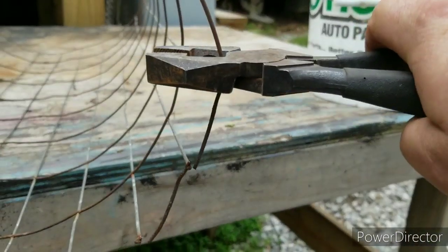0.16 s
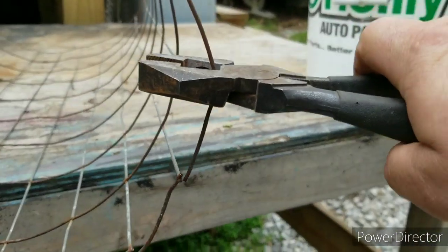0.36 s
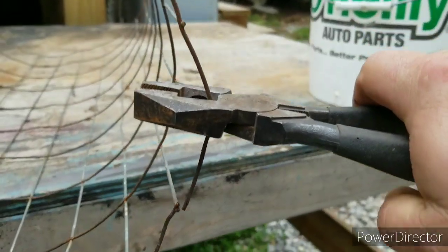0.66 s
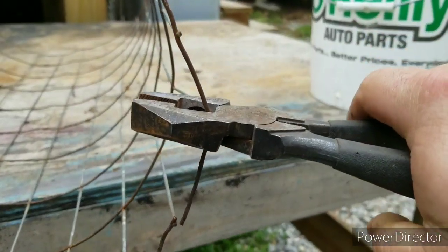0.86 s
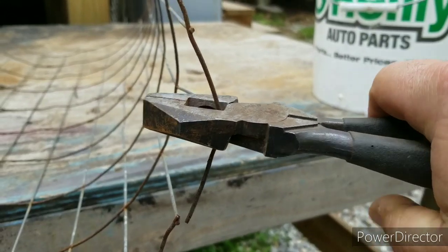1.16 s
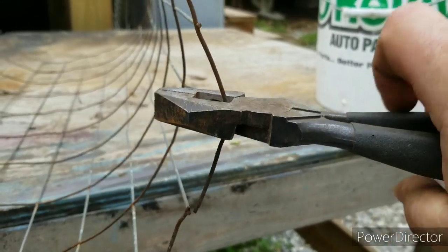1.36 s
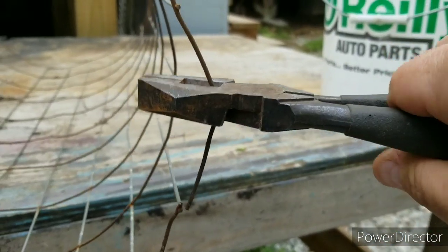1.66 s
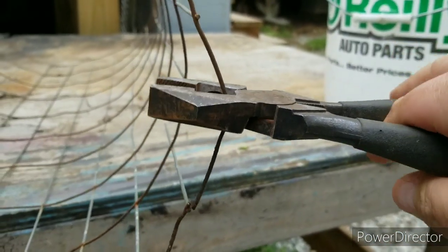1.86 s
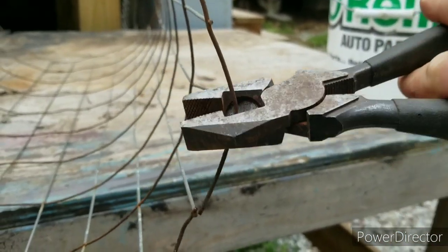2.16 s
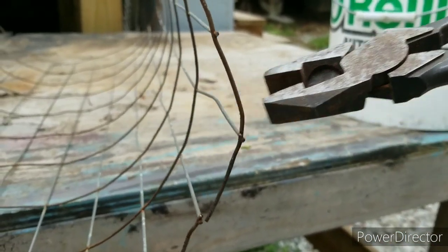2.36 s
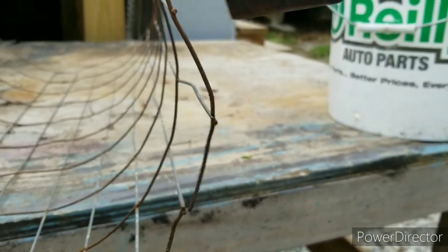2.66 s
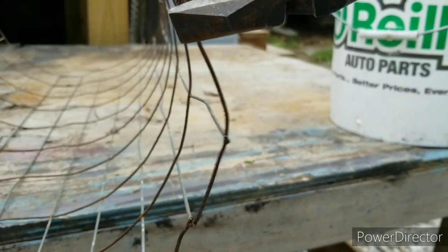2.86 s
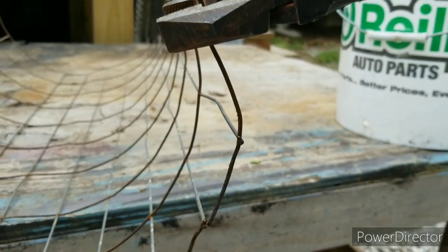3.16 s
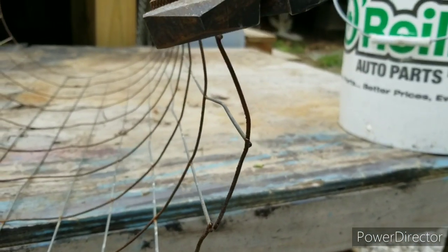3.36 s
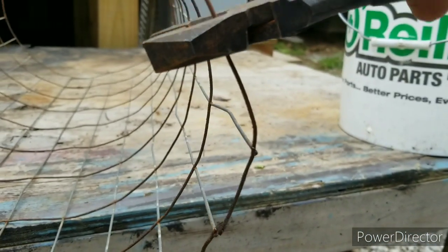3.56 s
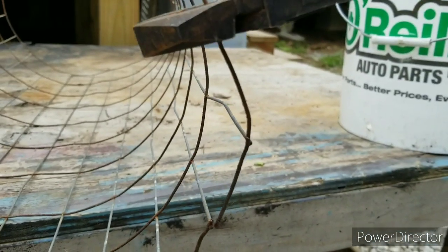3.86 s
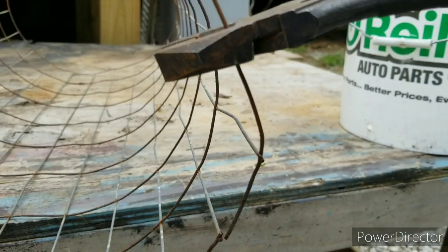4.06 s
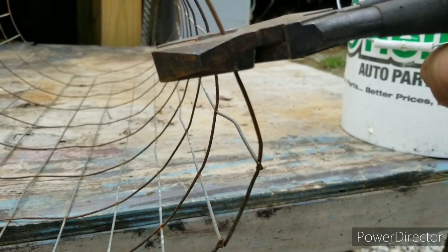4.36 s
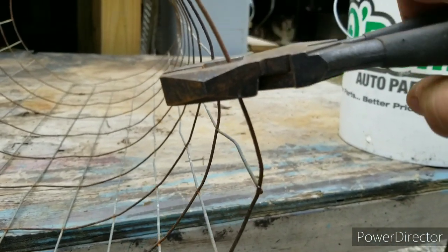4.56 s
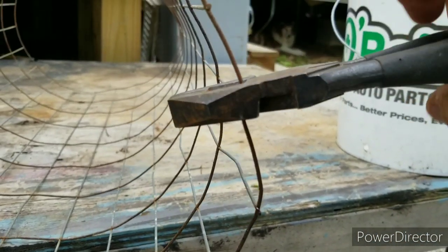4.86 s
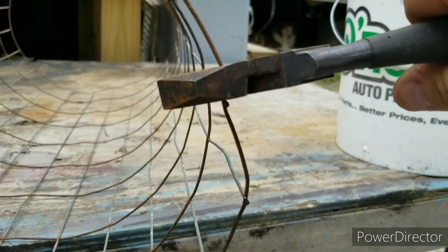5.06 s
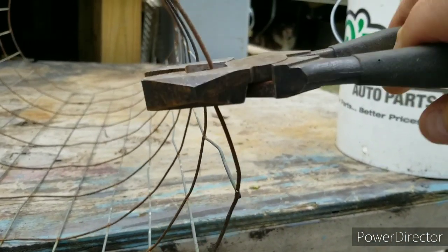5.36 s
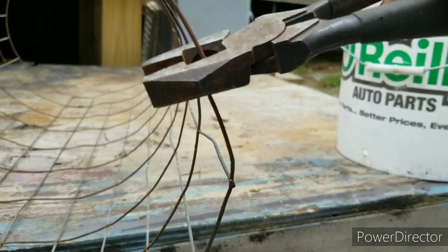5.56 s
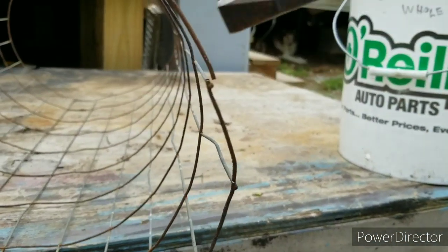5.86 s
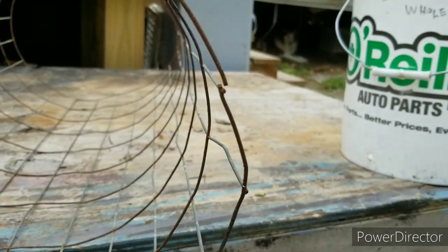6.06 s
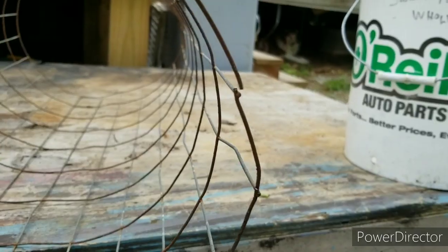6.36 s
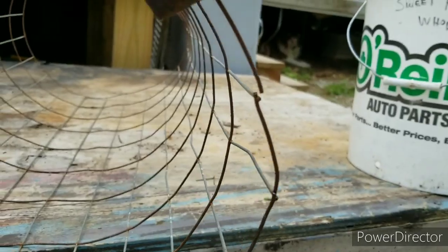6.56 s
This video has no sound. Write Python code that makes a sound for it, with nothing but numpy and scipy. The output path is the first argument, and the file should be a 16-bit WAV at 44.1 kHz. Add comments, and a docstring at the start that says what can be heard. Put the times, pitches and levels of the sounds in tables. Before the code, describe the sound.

Two hard metallic snips cut strands of a springy wire fence roll, with rattling, scraping mesh shivers over crickets and birds outdoors.

```python
"""Two hard snips, metallic shivers, taps and scrapes: heavy pliers cut two strands of a wire fence roll on a wooden
table outdoors. Each cut is a burst of cracks ringing the jaws, the freed ends and the table; jolts, shaking and
scrapes drive noise through the springy mesh's crowd of modes. Slips squeal, caught strands sing, the roll hums.
Around them: insect clicks through wing resonances, gliding and husky bird calls, rumble, hiss, a breeze and grip
bumps at a handheld two-port microphone."""
import sys
import numpy as np
from scipy import signal
from scipy.fft import rfft, irfft, next_fast_len
from scipy.io import wavfile
from scipy.ndimage import uniform_filter1d, map_coordinates

SR = 44100
rng = np.random.default_rng(int(sys.argv[2]) if len(sys.argv) > 2 else 0)


def log_audio(samples):
    """Write samples as a 16-bit WAV file to the path given in sys.argv[1]."""
    # one column per channel
    frames = np.atleast_2d(samples).T
    # limit to full scale, then quantise
    limited = np.clip(frames, -1, 1)
    pcm = np.round(limited * 32767).astype(np.int16)
    wavfile.write(sys.argv[1], SR, pcm)


N = 295911
TIME = np.arange(N) / SR  # [s]

# jolts to the mesh: (time [s], level [dB], bass [dB], treble [dB], ring length [factor],
#                     favoured pitch [Hz], favour [dB], hum level [dB])
JOLTS = [(1.241, -42, -1, 4, 1.5, 11700, 10, -38.5), (2.349, -36, -3, -2.5, 2.4, 4200, 1.5, -52),
         (2.383, -34, 0, -7.5, 1.84, 1560, 2.5, -43.5), (2.912, -41.5, 6, 8.5, 1.2, 1300, 11.5, -60),
         (3.163, -39, 3.5, -4.5, 1.34, 1680, 1, -44.5), (3.46, -48, 2, 7, 1.06, 4670, -2, -44.5),
         (3.625, -40, 0, -11.5, 1.54, 1620, 5, -46), (4.726, -28.5, -6.5, 4.5, 1.34, 1460, 5.5, -49),
         (5.028, -43, -16, 0.5, 1.82, 4960, -1, -58), (5.669, -44.5, -32, 7.5, 0.66, 4270, 3.5, -66),
         (5.845, -44.5, 7, 11, 1.02, 2080, 5.5, -45.5)]
# steady shaking of the roll by hand and jaws: (time [s], level [dB])
SHAKING = [(0, -53.5), (.6, -55.5), (.75, -66), (1.238, -64.5), (1.5, -45.5), (1.9, -54), (2.33, -50.5),
           (2.7, -56.5), (3.15, -43), (3.3, -46.5), (3.678, -48), (4.1, -63), (4.72, -58.5), (5.099, -63),
           (5.6, -54), (5.78, -38), (6.0, -45), (6.35, -55), (6.71, -55.5)]
# likeness of low sounds at the ports: (frequency [Hz], left-right likeness [-1..1])
LOW_ALIKE = [(25, .45), (60, .75), (130, .92), (300, .92), (640, .6)]
# tilt of low sounds between the ports: (frequency [Hz], left minus right [dB])
LOW_BALANCE = [(25, -6), (60, -2.5), (150, -.6)]


def amp(db):
    """Decibels to gain."""
    return 10 ** (np.asarray(db) / 20)


def unit(x):
    """Scaled to rms 1."""
    return x / np.sqrt(np.mean(x ** 2) + 1e-20)


def along(points, hz):
    """Interpolate (Hz, value) points on a log frequency axis."""
    point_hz, values = np.transpose(points)
    return np.interp(np.log(hz + 1), np.log(point_hz + 1), values)


def level(rows):
    """Gain per sample from (s, .., dB) rows; -150 dB outside them."""
    rows = np.array(rows)
    return amp(np.interp(TIME, rows[:, 0], rows[:, -1], left=-150, right=-150))


def held(s, hold_s, attack_s, release_s):
    """Gain that rises from s, holds at 1 and falls away."""
    rise = (TIME - s) / attack_s
    fall = (s + attack_s + hold_s + release_s - TIME) / release_s
    return np.clip(np.minimum(rise, fall), 0, 1) ** 2


def wobble(knots_per_s):
    """A smooth random curve through normally distributed knots."""
    knots = rng.standard_normal(int(N * knots_per_s / SR) + 4)
    return map_coordinates(knots, [TIME * knots_per_s])


def filtered(x, response):
    """x times a complex response of frequency."""
    m = next_fast_len(x.shape[-1] + SR // 4)
    return irfft(rfft(x, m) * response(np.fft.rfftfreq(m, 1 / SR)), m)[..., :x.shape[-1]]


def resonances(modes):
    """Causal response of (Hz, width Hz, dB) modes of alternating sign."""
    return lambda f: sum((-1) ** k * amp(db) * 1j * f * width / (hz * hz - f * f + 1j * f * width)
                         for k, (hz, width, db) in enumerate(modes))


def causal(gain):
    """Minimum-phase response of this gain: it rings only after its cause."""
    cepstrum = irfft(np.log(gain + 1e-9))
    half = len(cepstrum) // 2
    fold = np.r_[1, 2 * np.ones(half - 1), 1, np.zeros(half - 1)]
    return np.exp(rfft(cepstrum * fold))


def stereo(pair, gain, alike):
    """Two unrelated signals coloured and mixed to a left-right likeness."""
    turn = lambda hz: np.arccos(np.clip(along(alike, hz), -1, 1)) / 2
    mid, side = filtered(pair, lambda hz: gain(hz) * [np.cos(turn(hz)), np.sin(turn(hz))])
    return np.array([mid + side, mid - side])


def leaning(pair, balance):
    """A pair tilted left or right by frequency."""
    return filtered(pair, lambda f: amp(np.outer([.5, -.5], along(balance, f))))


def add(track, s, sound):
    """Mix a sound in from s seconds, cropped to the track."""
    k = round(s * SR)
    part = track[..., max(k, 0):k + sound.shape[-1]]
    part += sound[..., max(-k, 0):][..., :part.shape[-1]]


def snips():
    """A breaking strand's burst of cracks rings jaws and freed ends and knocks the table; it reaches right first."""
    # breaks: (time [s], ring energy [dB], low ring [dB], lower bite [dB], high ring [dB],
    #          table knock peak [dB], ring of the ends [dB])
    breaks = [(1.2458, 11, 0, 1, 2, -27, -39.5), (1.2471, 5, 3, 0, 0, -40, -50),
              (4.7229, -22, -6, -4, 0, -60, -70), (4.7252, 1, -3, -3, -3, -40, -46),
              (4.7260, 12, -8, -6, -3, -27, -35)]
    # ring of jaws and cut ends: (frequency [Hz], width [Hz], level [dB])
    jaws = [(1840, 110, 5), (4000, 550, 3), (4700, 550, 5.5), (6050, 480, 6), (7400, 700, -6),
            (9000, 1500, -14), (11100, 550, 1), (13300, 1000, -5)]
    # tilt of that ring: (frequency [Hz], left minus right [dB])
    jaw_balance = [(900, 0), (1900, 5), (4700, 4), (6000, 1), (8000, -8), (11000, -4), (14000, 0)]
    # wooden top: (frequency [Hz], width [Hz], level per pass [dB])
    table_top = [(123, 21, 0.5), (308, 200, 0.5)]
    # freed wire ends: (frequency [Hz], relative level [dB], t60 [s])
    free_ends = [(1182, 0, .32), (1303, -2, .55), (1635, -3, .4), (1738, -5, .35), (1984, -7, .4),
                 (3036, -7, .3), (5373, -4, .2)]
    break_s, left_lag_s = .00028, .000454
    shared = .75  # part of the burst's power both ports hear alike
    out, t = np.zeros((2, N)), np.arange(SR // 3) / SR
    waver = wobble(60)  # the loose ends chatter
    for s, db, low_db, bite_db, high_db, knock_db, ends_db in breaks:
        shape = (t / break_s) * np.exp(1 - t / break_s)
        both, left, right = rng.standard_normal((3, len(t)))
        burst = shape * (np.sqrt(shared) * both + np.sqrt(1 - shared) * np.array([left, right]))
        burst[0] = np.roll(burst[0], round(left_lag_s * SR))

        tone = [(900, low_db - 8), (1500, low_db), (2500, low_db), (3000, bite_db - 6), (3600, bite_db),
                (4800, bite_db), (5600, 0), (7000, 0), (9000, high_db)]
        rung = filtered(burst, lambda f: resonances(jaws)(f) * amp(along(tone, f)))
        ring = leaning(rung + amp(-21.5) * burst, jaw_balance)
        add(out, s, amp(db) * ring / np.linalg.norm(ring))

        knock = filtered(shape, lambda f: resonances(table_top)(f) ** 2)  # steep skirts: the thud stays low
        add(out, s, amp(knock_db) * knock / np.abs(knock).max())

        ends = 0
        for hz, rel_db, t60_s in free_ends:
            port_db = rng.normal(0, 1.6, (2, 1))
            chatter_db = 4.5 * np.roll(waver, rng.integers(N))[:len(t)]
            gain = amp(rel_db + port_db + chatter_db - 60 * t / t60_s)
            ends = ends + gain * np.sin(2 * np.pi * (hz * t + rng.random((2, 1))))
        add(out, s, amp(ends_db) * ends * (1 - np.exp(-t / 0.00182)))
    return out


def mesh():
    """Jolts, shaking and scrapes fill a crowd of wire modes; after a jolt the high ones die first."""
    # crowd of wire modes: (frequency [Hz], relative density [dB per Hz])
    crowd = [(53, -39), (90, -10.5), (228, -5.5), (295, -4), (390, -9.5), (539, -11.5), (1170, -13),
             (1390, -23), (1660, -8), (2720, -9), (4460, -10.5), (6580, -11.5), (9100, -30), (9920, -19),
             (15600, -25)]
    # modes that stand out: (frequency [Hz], width [Hz], level before a common lift [dB])
    strands = [(346, 29, -7.5), (446, 83, -8), (609, 12, -14), (807, 19, -10), (876, 20, -10),
               (1050, 12, -9.5), (1183, 26, -12.5), (1581, 65, -10), (1632, 25, -11), (1720, 18, -9),
               (2010, 12, -6.5), (2243, 17.5, -1.5), (3003, 55, -10), (4516, 110, -6.5), (5380, 100, -9)]
    # decay at ring length 1: (frequency [Hz], t60 [s])
    decay = [(120, 2.3), (400, 1.47), (1040, 0.97), (2760, 0.46), (7280, 0.3), (14000, 0.3)]
    # likeness at the ports: (frequency [Hz], left-right likeness [-1..1])
    alike = [(60, 0.95), (240, 1), (950, 0.72), (3770, -0.25), (15000, 0.026)]
    # tilt between the ports: (frequency [Hz], left minus right [dB])
    balance = [(60, -4), (180, 1), (550, -1.5), (1650, 4.5), (4970, 2.5), (15000, -4.5)]
    # jaws scrape along a strand: (middle [s], length [s], level [dB])
    scrapes = [(1.62, 0.13, -62), (1.726, 0.19, -60), (1.945, 0.43, -63.5), (3.232, 0.088, -56),
               (3.36, 0.21, -54.5), (3.748, 0.24, -62), (3.996, 0.14, -68), (5.74, 0.074, -56),
               (5.823, 0.058, -50)]
    shake_treble_db, scrape_treble_db = -16.5, 7  # dull shaking, bright scraping
    rise_s, rise_ref_db, rise_halves_db = 0.0044, -33, 7.5  # harder jolts rise faster
    grit_rms_db = 1  # rust makes a scrape catch and slip

    hz, t, z = signal.stft(singing_noise(depth_db=4.5) + ticks(), SR, nperseg=128)
    t60_s = along(decay, hz)[:, None]
    treble = along([(1500, 0.081), (9000, 1.0)], hz)[:, None]
    bass = along([(300, 0.68), (1500, 0.04)], hz)[:, None]
    shake_at, shake_db = np.transpose(SHAKING)
    power = amp(np.interp(t, shake_at, shake_db) + treble * shake_treble_db) ** 2

    grit = uniform_filter1d(rng.standard_normal(power.shape), size=24, axis=0)
    grit_db = grit_rms_db * unit(uniform_filter1d(grit, size=2, axis=1))
    for s, length_s, db in scrapes:
        stroke = np.exp(-(2 * (t - s) / length_s) ** 2)
        power = power + (amp(db + grit_db + treble * scrape_treble_db) * stroke) ** 2

    for s, db, bass_db, treble_db, longer, favoured_hz, favour_db, _ in JOLTS:
        jolt_rise_s = rise_s * 2 ** ((rise_ref_db - db) / rise_halves_db)
        age = np.clip(t - s, 0, None)
        fading_db = db + bass * bass_db + treble * treble_db - 60 * age / (t60_s * longer)
        # the place of contact favours one region of modes
        near = np.exp(-(np.log((hz[:, None] + 1) / favoured_hz) / .22) ** 2)
        fading_db = fading_db + favour_db * near
        power = power + (amp(fading_db) * (1 - np.exp(-age / jolt_rise_s))) ** 2

    # strands slap each other in short patches, each in its own range of pitch
    slaps = uniform_filter1d(rng.standard_normal(power.shape), size=5, axis=0)
    slap_gain = amp(0.68 * unit(uniform_filter1d(slaps, size=8, axis=1)))
    shiver = signal.istft(z * np.sqrt(power) * slap_gain, SR, nperseg=128)[1][:, :N]
    colour = lambda f: np.hypot(amp(along(crowd, f)), amp(2.5) * abs(resonances(strands)(f)))
    scale = np.sqrt(np.mean(colour(np.linspace(0, SR / 2, 4000)) ** 2))
    wires = stereo(shiver + knocks(), lambda f: causal(colour(f) / scale), alike)
    return leaning(wires, balance)


def singing_noise(depth_db):
    """Two noises in which narrow lines swell and fade, as countless modes take turns."""
    z = signal.stft(rng.standard_normal((2, N)), nperseg=2048)[2]
    field = uniform_filter1d(rng.standard_normal(z.shape[1:]), size=10, axis=1)
    return unit(signal.istft(z * amp(depth_db * unit(field)), nperseg=2048)[1][:, :N])


def ticks():
    """Strands tick against each other: dense tiny contacts of uneven size, each from its own side."""
    ticks_per_s, rms_db = 1200, -4
    struck = rng.random(N) < ticks_per_s / SR
    return amp(rms_db) * unit(struck * rng.standard_normal((2, N)))


def knocks():
    """Jaws tap the wire: brief dull noise blows that set the wire modes going."""
    # taps: (time [s], starting noise level before dulling [dB])
    taps = [(2.353, -26), (2.4005, -27), (2.917, -31), (3.628, -35), (5.678, -33)]
    t60_s, top_hz = .012, 7000
    out, t = np.zeros((2, N)), np.arange(SR // 50) / SR
    for s, db in taps:
        add(out, s, amp(db - 60 * t / t60_s) * rng.standard_normal((2, len(t))))
    return filtered(out, lambda f: 1 / (1 + 1j * f / top_hz) ** 2)


def squeal():
    """The jaws let go in jerks, steel on steel: each slip is a short rasp that rings a few high modes of the jaws."""
    # jerks: (time [s], peak level before the tilt [dB])
    jerks = [(2.352, -29), (2.3599, -26.5), (2.381, -26), (2.398, -30), (2.417, -33)]
    # squealing jaws: (frequency [Hz], width [Hz], relative level [dB])
    squeal_modes = [(5430, 35, 9), (5560, 160, 1), (5850, 120, -4)]
    rise_s, t60_s = 0.00032, 0.057
    out, t = np.zeros((2, N)), np.arange(SR // 8) / SR
    for s, db in jerks:
        rasp = (1 - np.exp(-t / rise_s)) * amp(-60 * t / t60_s) * rng.standard_normal((2, len(t)))
        ring = filtered(rasp, resonances(squeal_modes))
        add(out, s, amp(db) * ring / np.abs(ring).max())
    return out * amp([[1.5], [-1.5]])  # tilted left


def catches():
    """A strand caught by the jaws sings out of the crowd: it rattles at its own pitch and dies away."""
    # caught strands: (time [s], pitch [Hz], level before the tilt [dB], t60 [s])
    caught = [(2.378, 1546, -43.5, 1.0), (2.382, 1256, -41, 0.53), (2.432, 3050, -44, 0.23),
              (2.985, 1573, -48.5, 0.58), (3.18, 2900, -50, 0.26), (3.628, 1683, -52, 1),
              (3.627, 3870, -51.5, .25), (5.676, 4150, -49, 0.47), (5.679, 1660, -46, 0.14),
              (5.807, 5500, -52, 0.14), (5.885, 5450, -55, 0.097)]
    sharpness, rise_s = 14, .001  # pitch over width per pass
    out, t = np.zeros((2, N)), np.arange(SR) / SR
    for s, hz, db, t60_s in caught:
        both, left, right = rng.standard_normal((3, len(t)))
        mode = resonances([(hz, hz / sharpness, 0)])
        rattle = unit(filtered(both + np.array([left, right]), lambda f: mode(f) ** 2))
        add(out, s, rattle * amp(db - 60 * t / t60_s) * (1 - np.exp(-t / rise_s)))
    return out * amp([[1.5], [-1.5]])  # tilted left


def hum():
    """The whole roll hums low as it sways: slowly after each jolt, and with the shaking."""
    # swaying roll: (frequency [Hz], width per pass [Hz], level [dB])
    sway_mode = [(114.4, 22, 0)]
    rise_s, t60_s, over_shaking_db = 0.048, 1.47, -10
    power = (level(SHAKING) * amp(over_shaking_db)) ** 2
    for s, *_, hum_db in JOLTS:
        age = np.clip(TIME - s, 0, None)
        power = power + (amp(hum_db - 60 * age / t60_s) * (1 - np.exp(-age / rise_s)) ** 2) ** 2
    sway = stereo(rng.standard_normal((2, N)), lambda f: resonances(sway_mode)(f) ** 2, LOW_ALIKE)
    return np.sqrt(power) * unit(sway)


def thumps():
    """The grip bumps the right port: soft low swells, much weaker in the left."""
    # bumps: (time [s], peak of the swell at the right port [dB])
    bumps = [(1.015, -36), (1.109, -35), (1.177, -31), (4.509, -27)]
    hz, peak_s, left_db = 56, .013, -16
    out, t = np.zeros(N), np.arange(SR // 5) / SR
    for s, db in bumps:
        swell = amp(db) * (t / peak_s * np.exp(1 - t / peak_s)) ** 2
        add(out, s, -swell * np.sin(2 * np.pi * hz * t))
    return out * amp([[left_db], [0]])


def birds():
    """Gliding whistles with a short blur of echoes, and husky calls of narrow noise on a moving pitch."""
    # lone whistles and chirps: (time [s], length [s], from [Hz], to [Hz], level [dB])
    lone_notes = [(.058, .025, 3150, 3330, -56), (.14, .03, 2270, 2290, -54), (.2, .05, 2380, 1650, -55),
                  (.25, .035, 4310, 4350, -58), (1.068, .03, 2040, 2000, -62),
                  (1.81, .035, 3700, 3700, -62), (1.86, .12, 3720, 3690, -61),
                  (6.565, .08, 3690, 3700, -70), (6.618, .03, 2280, 1950, -62)]
    # a five-note figure: (time in figure [s], length [s], from [Hz], to [Hz], relative level [dB])
    figure = [(0, .026, 2930, 2810, 0), (.03, .026, 2570, 2520, -2), (.103, .032, 2330, 2260, 1),
              (.175, .03, 2600, 2860, -1), (.275, .03, 2200, 2360, -6)]
    # when the figure sounds: (time [s], level [dB])
    figure_starts = [(-.005, -50), (5.387, -56), (5.73, -55), (6.07, -53.5), (6.408, -54.5)]
    # husky calls: (time [s], glide length [s], from [Hz], to [Hz], level [dB])
    husky_calls = [(-.1, 0.43, 2400, 2300, -59), (0.285, 0.39, 2254, 2283, -54),
                   (1.103, 0.16, 2500, 2860, -53.5), (1.47, .18, 2320, 2390, -59.5),
                   (1.67, 0.43, 2630, 2700, -60.5), (2.22, 0.2, 2490, 2800, -57),
                   (5.902, 0.47, 2250, 2323, -61), (6.378, 0.255, 2750, 2700, -63)]
    attack_s, release_s = .05, .13
    flutter_hz = 20 * wobble(50)  # the pitch of a husky call wavers
    husk_knots_per_s = 400  # sets the width of its noise

    notes = list(lone_notes)
    for s, db in figure_starts:
        notes += [(s + at, length_s, a, b, db + rel_db) for at, length_s, a, b, rel_db in figure]
    clear = np.zeros(N)
    for s, length_s, from_hz, to_hz, db in notes:
        u = np.linspace(0, 1, round(length_s * SR))
        phase = 2 * np.pi * np.cumsum(from_hz + (to_hz - from_hz) * u) / SR
        add(clear, s, amp(db) * np.sin(np.pi * u) * np.sin(phase))
    t = np.arange(SR // 4) / SR
    echoes = rng.standard_normal((2, len(t))) * amp(-60 * t / .35)  # t60 0.35 s
    echoes = echoes / np.linalg.norm(echoes[0])
    out = clear * amp([[0], [-3]]) + amp(-1) * signal.fftconvolve(clear[None], echoes, axes=1)[:, :N]

    husk = np.array([wobble(husk_knots_per_s) + 1j * wobble(husk_knots_per_s) for _ in range(2)])
    for s, length_s, from_hz, to_hz, db in husky_calls:
        glide = np.sqrt(np.clip((TIME - s) / length_s, 0, 1))
        pitch_hz = from_hz + (to_hz - from_hz) * glide + flutter_hz
        turn = np.exp(2j * np.pi * np.cumsum(pitch_hz) / SR)
        call = (turn * np.roll(husk, rng.integers(N), axis=1)).real
        out = out + amp(db) * held(s, length_s - release_s, attack_s, release_s) * call
    return out


def crickets():
    """Many far insects: dense wing clicks through steep resonances."""
    # chorus: (time [s], level [dB])
    chorus = [(0, -56.5), (4.7, -56), (5, -60), (5.4, -61), (6.71, -59.5)]
    # wings: (frequency [Hz], width per pass [Hz], relative level per pass [dB])
    wings = [(5496, 250, -7), (5902, 440, -6)]
    clicks = rng.standard_normal((2, N)) * (rng.random((2, N)) < .15) * amp(1.4 * wobble(33))
    return level(chorus) * unit(filtered(clicks, lambda f: resonances(wings)(f) ** 2))


def surroundings():
    """Low noise rumble that lumps unevenly, under a thin, gently wavering hiss."""
    # rumble: (time [s], level [dB])
    rumble_level = [(0, -53), (2.5, -51.5), (4.3, -53), (5.5, -59), (6.71, -49.5)]
    # rumble colour: (frequency [Hz], relative density [dB per Hz])
    rumble_tone = [(30, -49.5), (45, -11.5), (62, 3.5), (100, -8.5), (153, -11.5), (251, -12.5),
                   (431, -23.5), (600, -38.5), (900, -76.5)]
    # far leaves and insects: (frequency [Hz], relative density [dB per Hz])
    air_tone = [(240, -39), (450, -9.5), (740, -17), (1050, -16), (1380, -53.5), (1700, -40), (2230, -7.5),
                (3400, -16), (4600, -10.5), (6300, -13), (7500, -64.5), (8450, -38), (11800, -19.5),
                (15600, -22.5)]
    # likeness of the hiss at the ports: (frequency [Hz], left-right likeness [-1..1])
    air_alike = [(60, 0.71), (240, 0.83), (950, -1.1), (3770, 0.51), (15000, -0.087)]
    air_db = -63.5
    low = stereo(rng.standard_normal((2, N)), lambda f: amp(along(rumble_tone, f)), LOW_ALIKE)
    rumble = level(rumble_level) * unit(leaning(low, LOW_BALANCE) * amp(0.3 * wobble(2)))
    hiss = stereo(rng.standard_normal((2, N)), lambda f: amp(along(air_tone, f)), air_alike)
    return rumble + amp(air_db + 2.9 * wobble(2.63)) * unit(hiss)


def breeze():
    """Air moving over the ports: soft buffeting at the very bottom, partly its own in each port."""
    # moving air: (time [s], level [dB])
    air_flow = [(0, -77), (1.6, -63), (4.2, -61), (6.71, -81)]
    buffet = resonances([(42.2, 25, 0)])  # passed twice
    puffs = stereo(rng.standard_normal((2, N)), buffet, LOW_ALIKE)
    return level(air_flow) * unit(leaning(filtered(puffs, buffet), LOW_BALANCE))


def scene():
    """All sources at the two ports."""
    wire = snips() + mesh() + hum() + squeal() + catches()
    return wire + thumps() + birds() + crickets() + surroundings() + breeze()


def record(dry):
    """The input stage rounds off peaks near full scale; a band limit then removes the top."""
    full_scale, top_hz = 1, 15700
    rounded = dry / (1 + (dry / full_scale) ** 6) ** (1 / 6)
    return filtered(rounded, lambda hz: hz < top_hz)


dry = scene()
out = record(dry)
log_audio(out)
```